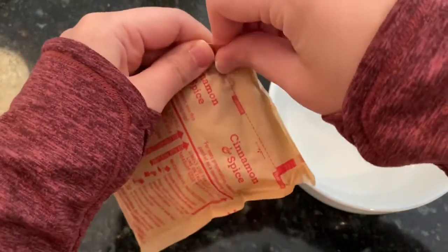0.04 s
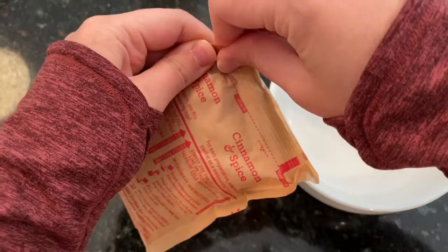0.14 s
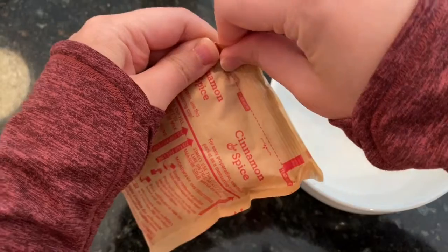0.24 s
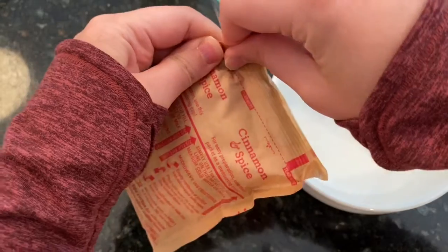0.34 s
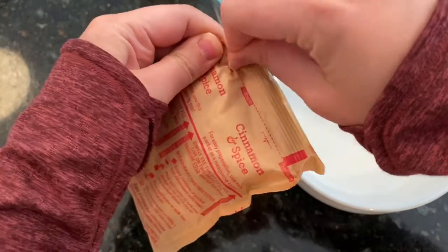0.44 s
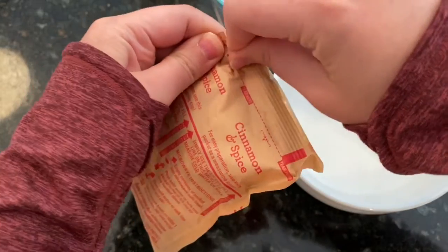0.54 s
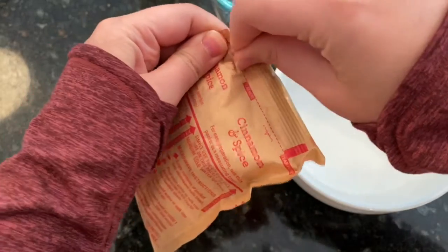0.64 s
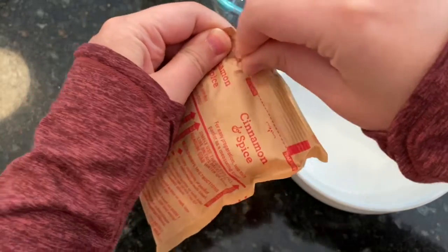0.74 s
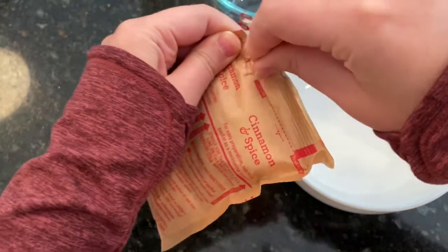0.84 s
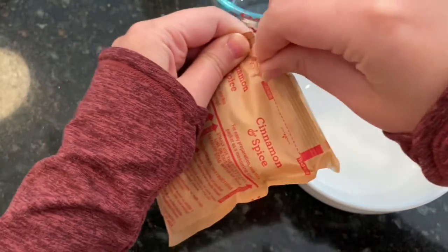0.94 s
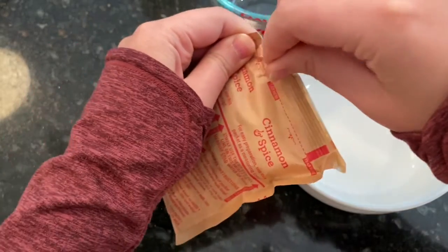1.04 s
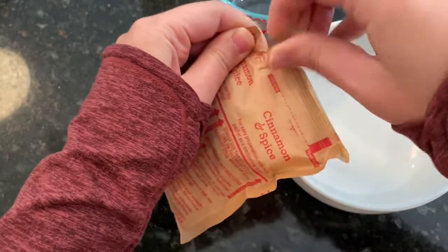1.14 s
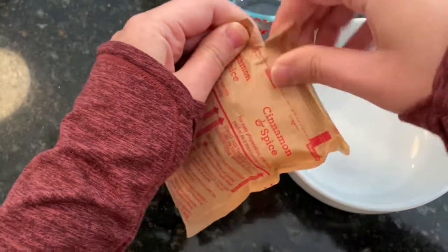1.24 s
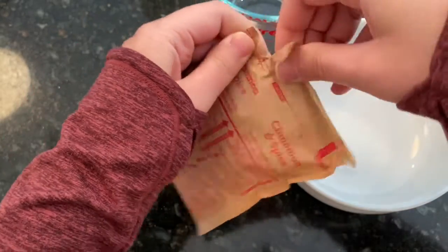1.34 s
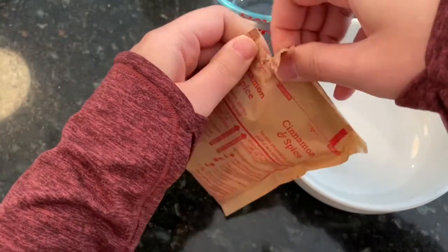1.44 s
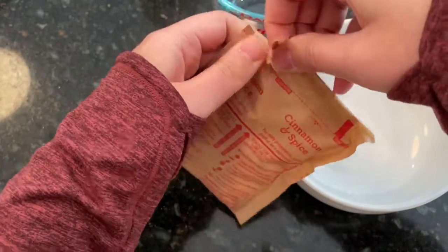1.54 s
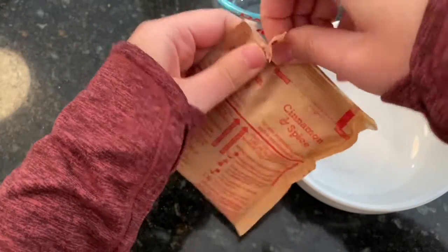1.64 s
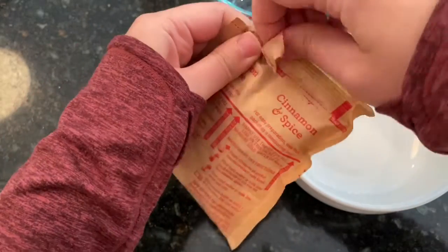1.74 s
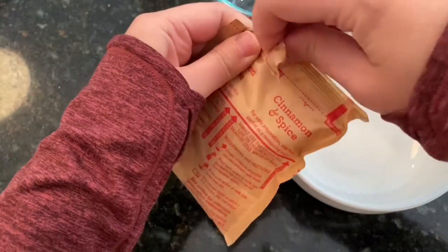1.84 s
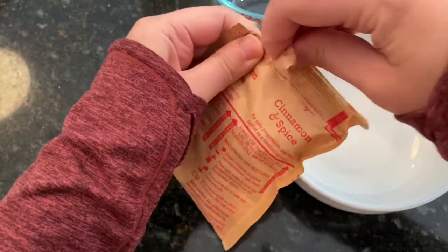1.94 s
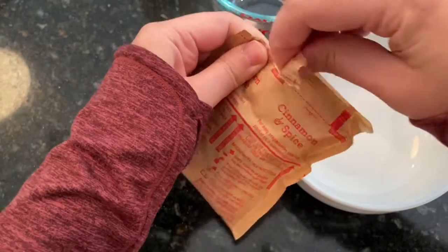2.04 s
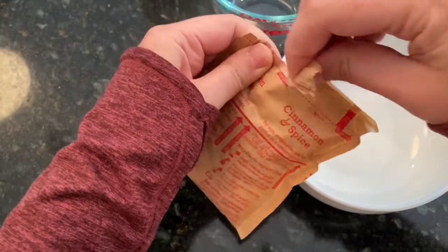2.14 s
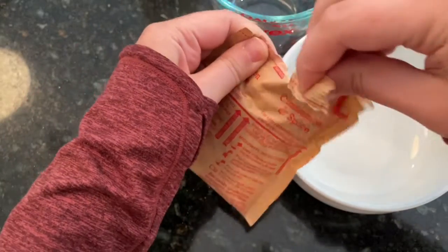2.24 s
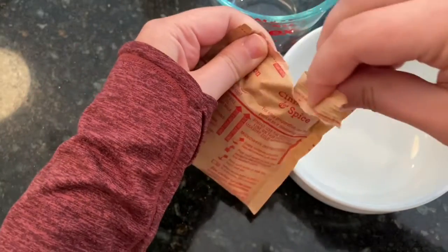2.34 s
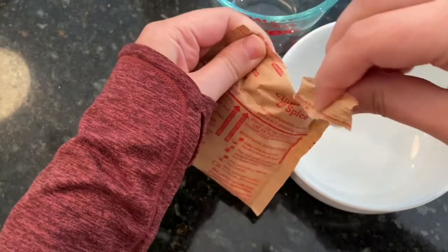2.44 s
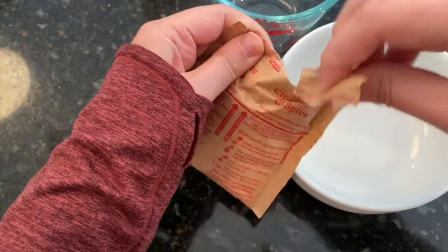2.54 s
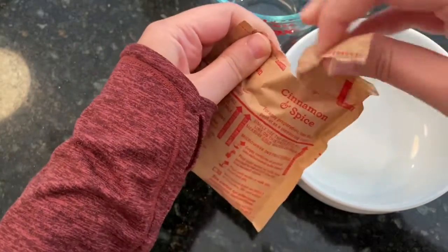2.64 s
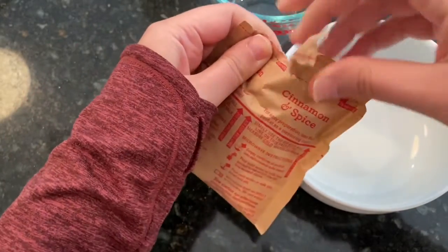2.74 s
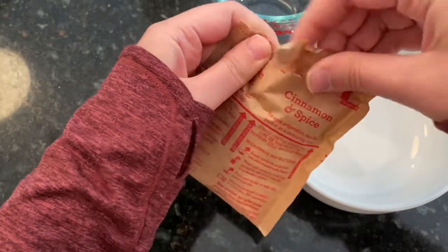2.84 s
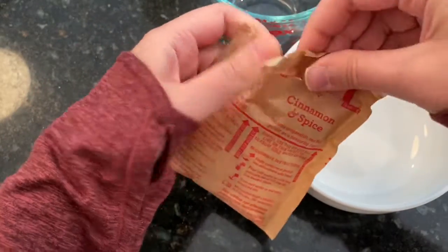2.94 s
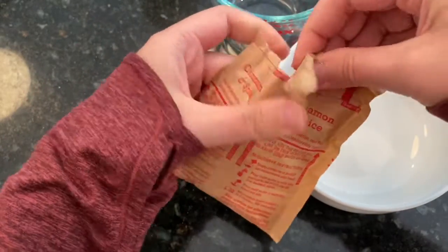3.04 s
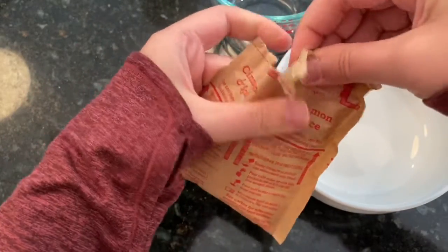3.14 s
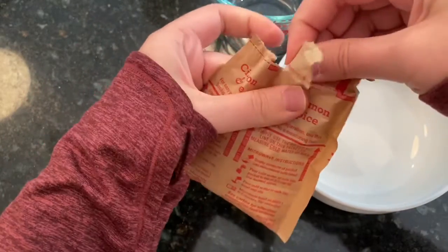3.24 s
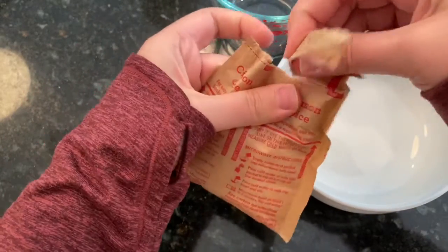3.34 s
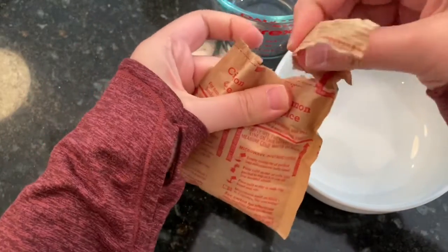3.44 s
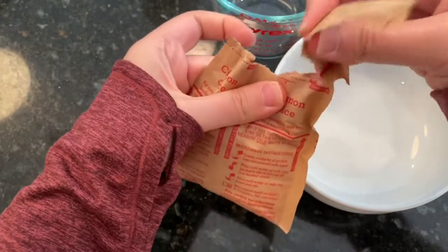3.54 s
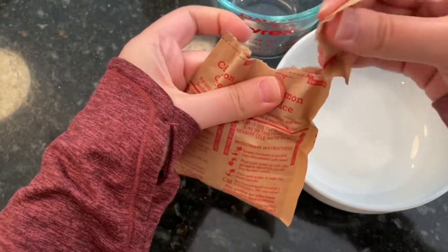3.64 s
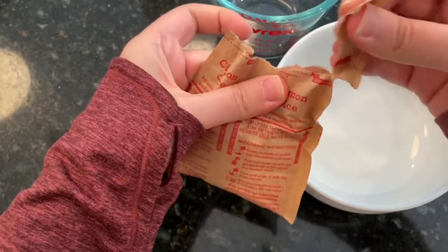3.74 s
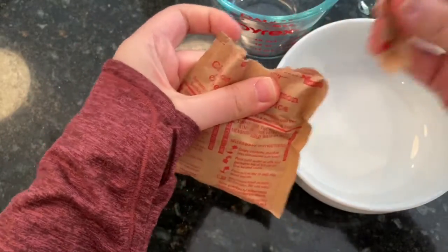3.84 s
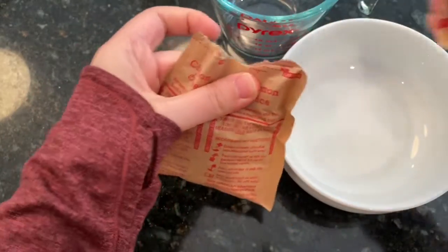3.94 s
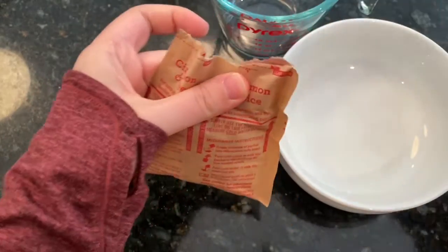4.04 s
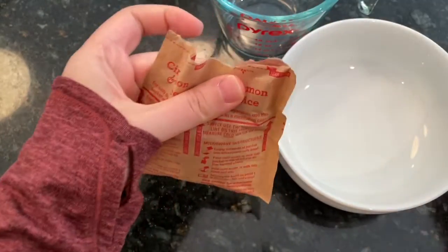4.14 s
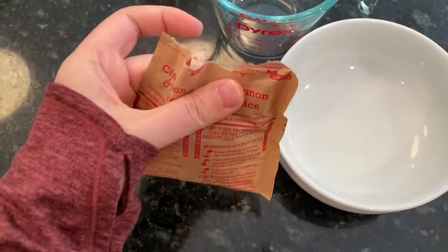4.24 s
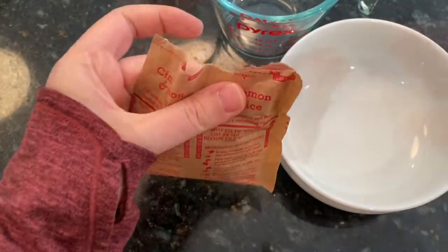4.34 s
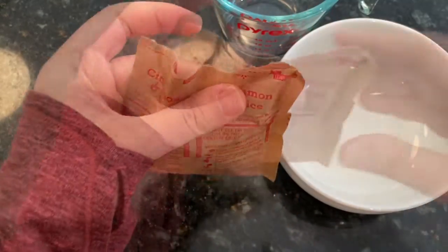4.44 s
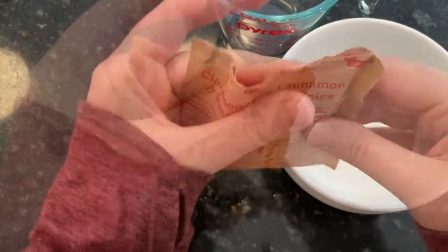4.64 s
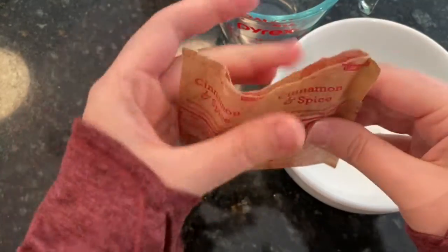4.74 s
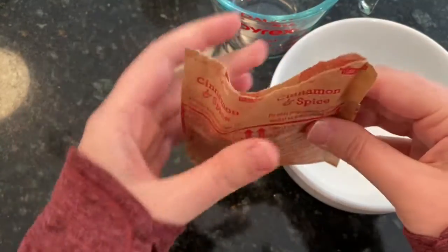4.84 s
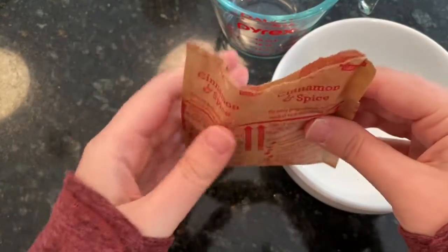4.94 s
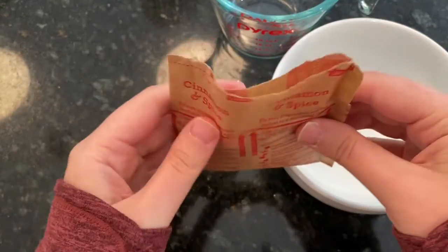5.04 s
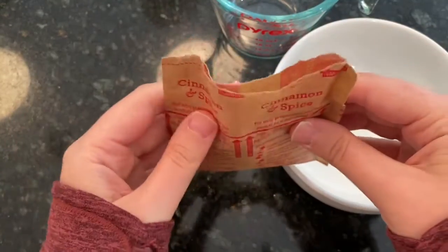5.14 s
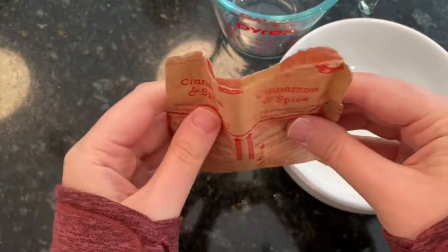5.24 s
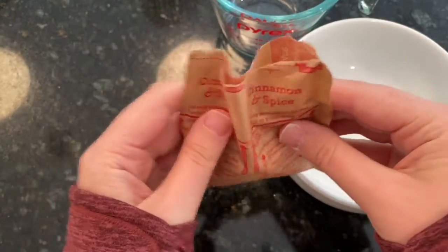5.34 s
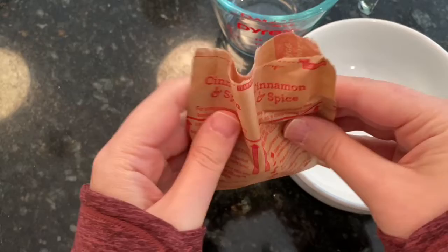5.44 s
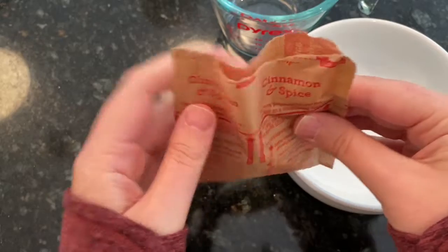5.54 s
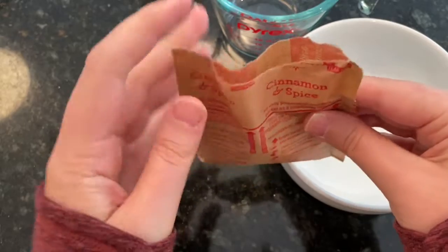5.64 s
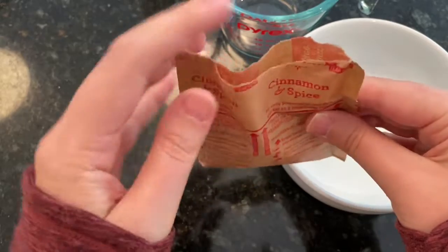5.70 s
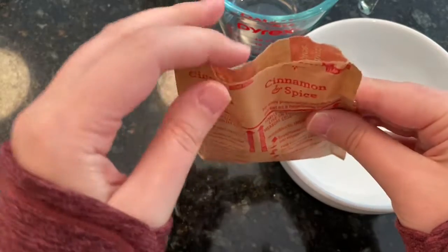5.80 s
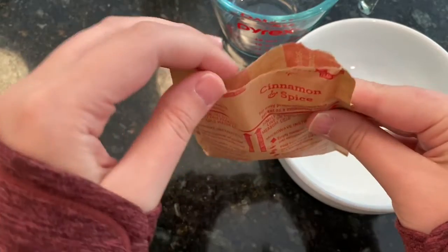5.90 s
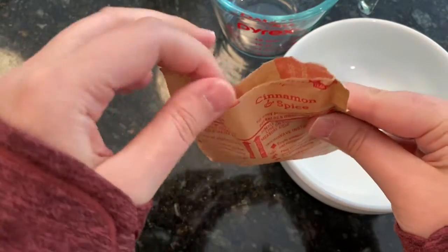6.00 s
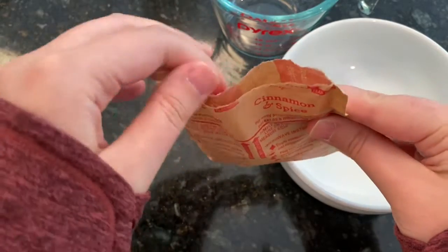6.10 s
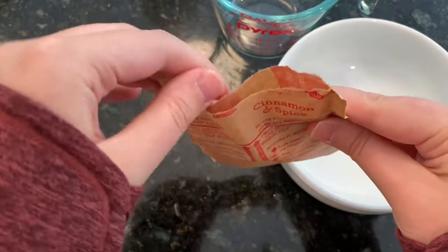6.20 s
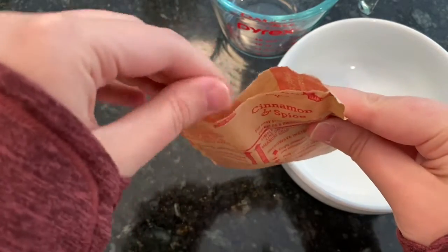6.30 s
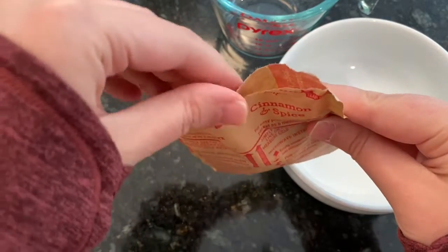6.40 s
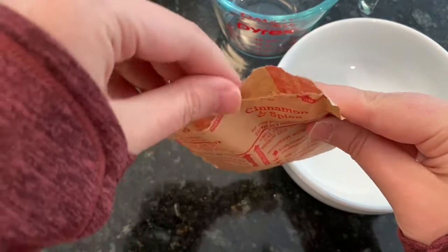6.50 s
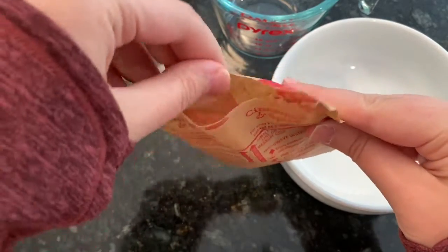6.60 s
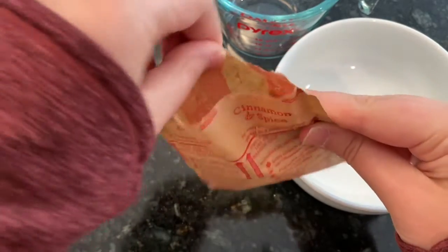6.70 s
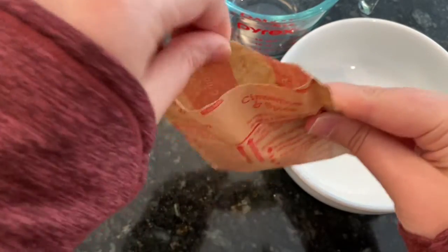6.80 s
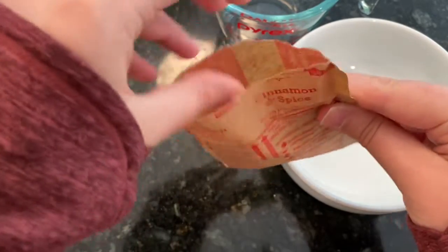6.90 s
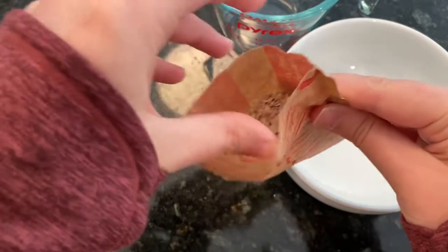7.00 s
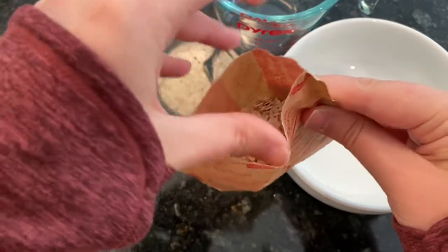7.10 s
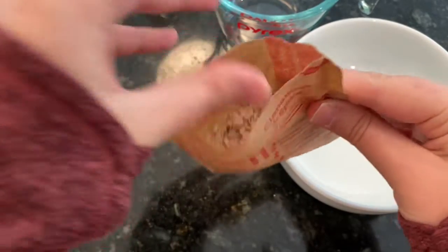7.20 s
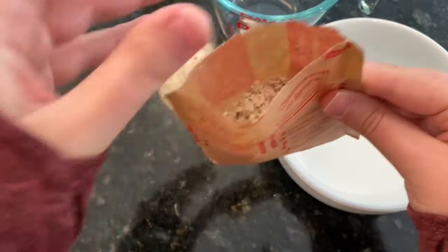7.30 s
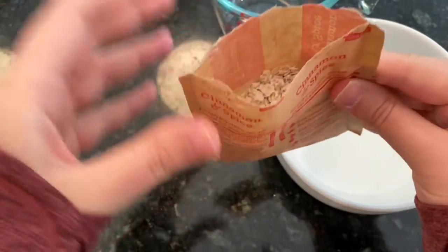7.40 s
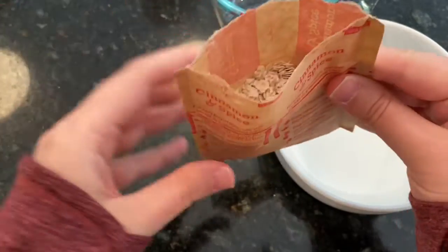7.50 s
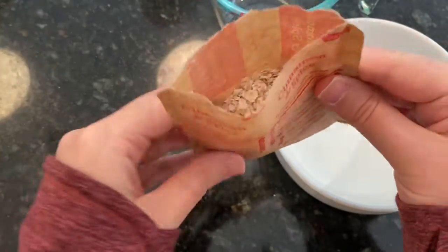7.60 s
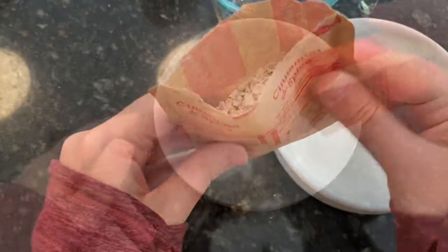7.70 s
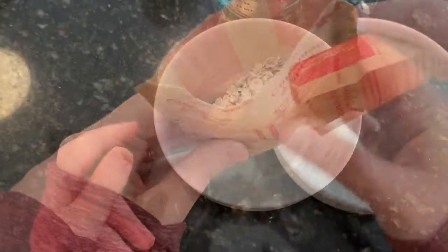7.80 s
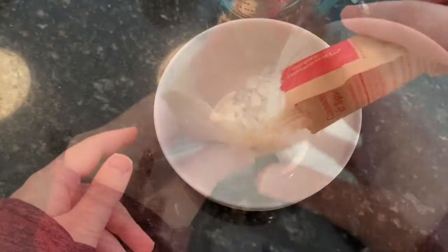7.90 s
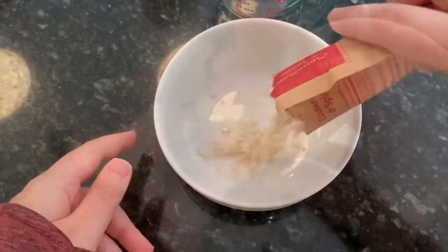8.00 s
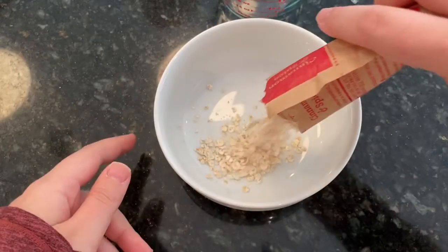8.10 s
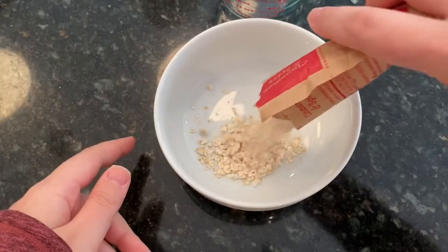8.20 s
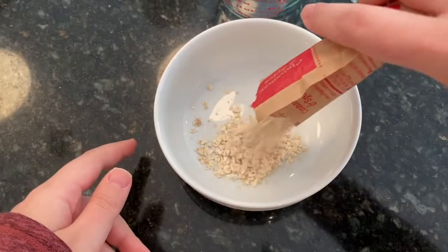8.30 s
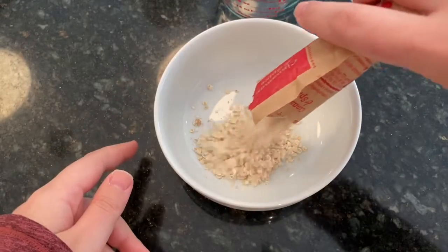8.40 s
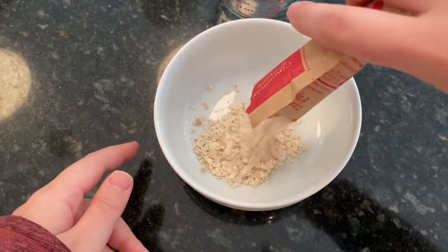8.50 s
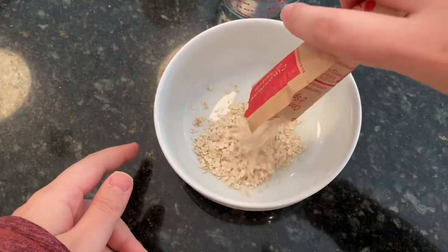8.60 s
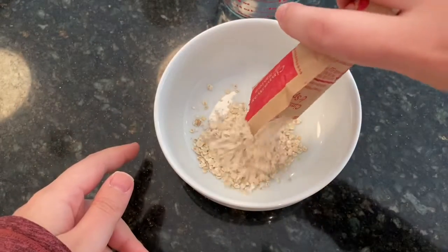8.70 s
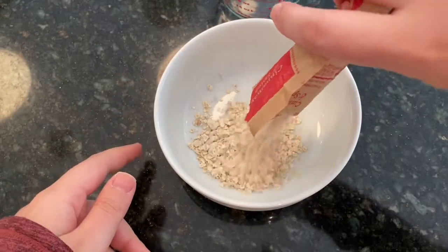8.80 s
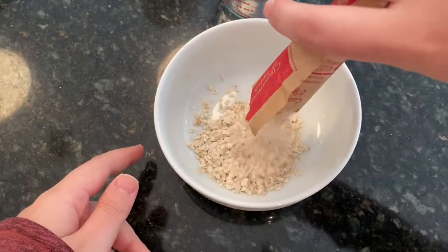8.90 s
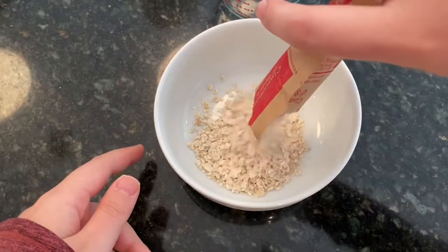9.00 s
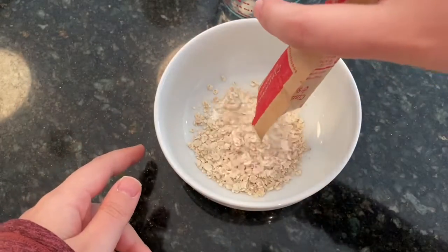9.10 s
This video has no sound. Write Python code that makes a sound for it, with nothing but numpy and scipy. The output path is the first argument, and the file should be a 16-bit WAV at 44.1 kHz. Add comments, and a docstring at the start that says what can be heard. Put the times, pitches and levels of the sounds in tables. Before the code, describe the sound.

Very close, hands work at a stiff paper packet: soft rubbing, sharp little cracks and short fizzy rips, thickest from one to four seconds. After a near-silent pause the paper is crinkled open in sparser bursts. At about eight seconds dry flakes pour into a ceramic bowl, a bright patter with a faint ring and a few lumps dropping. A low fridge hum sits behind; close stereo microphone in a kitchen.

```python
"""Paper packet torn, flakes poured

Close by, over a stone counter, hands tear a paper packet, pull it wide and pour dry flakes into a bowl.
Paper is filtered noise and short clicks: rubs, single cracks, dense rips and low thumps of the bag wall.
Flakes are a patter of pitched grains that rings the bowl's modes; lumps drop on the heap.
Behind, a fridge hums in two sines over low room noise; this background dips briefly twice.
The microphone has two ports a little apart: phase, balance and likeness vary with frequency."""
import sys
import numpy as np
from scipy import signal
from scipy.io import wavfile
from scipy.ndimage import uniform_filter1d

SR = 44100
rng = np.random.default_rng(int(sys.argv[2]) if len(sys.argv) > 2 else 0)


def file_out(sig):
    """Save sig as 16-bit WAV at sys.argv[1]."""
    # one column per channel
    cols = np.atleast_2d(sig).T
    # limit, then scale
    lim = np.clip(cols, -1, 1)
    pcm = np.round(lim * 32767).astype(np.int16)
    wavfile.write(sys.argv[1], SR, pcm)


N = 403515

# Fridge and room, in the background
HUM_HZ, HUM_DB = 58.8, -50
OVERTONE_DB = -11.5  # middle of its wavering level, against the fundamental
ROOM_NOISE_DB = -5  # against the hum
# Spectrum of the room noise: f/Hz, relative level per Hz/dB
ROOM_SPECTRUM = [(45, -34), (75, -8), (90, -2.5), (150, -10.5), (230, -4.5), (360, -4.5), (520, -10.5),
                 (640, -20), (1000, -61), (15800, -79), (16200, -99.5)]
# Likeness of the room noise at the two ports: f/Hz, correlation/1
ROOM_LIKENESS = [(60, 0.59), (300, 0.86), (1400, 0.056)]
# Brief dips of the background: t of the lowest point/s, depth/dB, fall/s, return/s
BACKGROUND_DIPS = [(4.59, -5, .29, .21), (7.92, -7, .14, .2)]

# Fingers sliding and contents shifting: t/s, level/dB
HANDLING_LEVEL = [(0, -54), (.29, -68), (.55, -59), (.8, -47.5), (.93, -53), (1.08, -61), (1.35, -49.5),
                  (1.75, -49), (2.1, -45), (2.45, -45.5), (2.58, -54), (2.75, -52.5), (3.2, -48.5),
                  (3.9, -58), (4.1, -59.5), (4.25, -71.5), (4.5, -72), (4.75, -51), (4.88, -66.5),
                  (5.05, -54), (5.45, -50.5), (5.7, -56), (5.8, -68), (6.05, -56), (6.3, -66),
                  (6.62, -52.5), (6.8, -48.5), (7.15, -52.5), (7.32, -66.5), (7.54, -78), (7.62, -51),
                  (7.8, -55.5), (7.96, -44)]
RUSTLE_END_S, RUSTLE_OFF_DB = 7.99, -88  # the hands let the packet rest as the pouring starts
RUB_BODY_DB = -5  # rustle below 1.5 kHz, against its crispness
# Colour of the paper: f/Hz, relative level/dB
PAPER_SPECTRUM = [(150, 0.5), (500, 1), (1500, 2.5), (3000, 3.5), (5000, 0.5), (8000, -1), (11500, -0.5),
                  (15700, -6.5), (16100, -57)]

# Creases that buckle and fibres that let go: t/s, body level/dB, crisp level above 3 kHz/dB
CREASE_SNAPS = [(0.047, -39, -45), (0.219, -33.5, -36), (0.305, -39.5, -54), (0.413, -25, -37),
                (0.48, -43, -29.5), (0.502, -31.5, -27.5), (0.619, -34, -31.5), (0.644, -42, -24.5),
                (0.678, -29, -29.5), (0.696, -26.5, -24), (0.705, -29.5, -21), (0.725, -38, -19),
                (0.746, -44, -19), (0.806, -23.5, -20), (0.821, -23.0, -15.5), (0.917, -19.5, -17.5),
                (0.984, -53.0, -37), (1.02, -53.0, -38.5), (1.109, -35.0, -60.5), (1.117, -31.5, -30.0),
                (1.146, -48, -35.5), (1.157, -33.5, -41), (1.212, -32.5, -26), (1.226, -44.5, -26.5),
                (1.234, -33.5, -31), (1.253, -20, -18.5), (1.326, -36.0, -44), (1.38, -39, -45),
                (1.399, -27, -18.5), (1.415, -35.0, -26), (1.44, -45, -41), (1.487, -31.5, -32.5),
                (1.579, -30.5, -23), (1.587, -31, -34), (1.61, -27, -16), (1.619, -33, -18),
                (1.628, -18, -11.5), (1.64, -31, -23), (1.675, -33, -18.0), (1.693, -28.5, -17),
                (1.707, -35.0, -20.5), (1.716, -37, -23.5), (1.726, -41.5, -25.5), (1.768, -38, -28),
                (1.793, -22, -24), (1.828, -32, -29), (1.859, -54, -30.5), (1.889, -49, -38),
                (1.931, -33, -23), (1.953, -22.5, -26.0), (1.985, -24.5, -28), (2.025, -23.5, -17.5),
                (2.09, -53, -30), (2.122, -42, -26), (2.135, -46, -25), (2.142, -31, -24.5),
                (2.158, -33, -22), (2.168, -44, -22), (2.196, -18, -19.5), (2.245, -36, -33),
                (2.267, -19.5, -17), (2.293, -24.5, -31), (2.307, -30, -24), (2.336, -31.5, -28),
                (2.405, -39, -24), (2.426, -48, -22), (2.475, -36, -20.5), (2.492, -45, -33),
                (2.566, -37, -46), (2.578, -42, -31.0), (2.592, -30.5, -25.5), (2.617, -26, -28),
                (2.644, -35.5, -33.5), (2.701, -26, -21), (2.804, -24, -16.5), (2.85, -30.5, -21.5),
                (2.865, -30, -29), (2.885, -37, -26), (2.891, -42, -27), (2.904, -27.0, -23.5),
                (2.94, -46, -50), (2.958, -27, -44), (2.975, -32.5, -30.5), (2.987, -32, -36.0),
                (3.012, -22.5, -22.5), (3.031, -21, -14.5), (3.076, -32, -45), (3.096, -20, -20),
                (3.144, -32.5, -20.0), (3.149, -25, -27.5), (3.168, -23, -16.5), (3.182, -26, -24),
                (3.2, -40, -28), (3.209, -30, -31), (3.257, -47, -27.0), (3.286, -26.5, -34),
                (3.306, -21, -17), (3.362, -28, -17.5), (3.708, -45.0, -30), (3.725, -43.5, -28),
                (3.734, -42, -28), (3.743, -39.0, -28.0), (3.751, -33.5, -35), (3.813, -27, -26),
                (3.822, -31, -34), (3.83, -23, -19.5), (3.956, -41, -25.5), (4.087, -47.5, -34.0),
                (4.541, -48.5, -41.5), (4.678, -37, -44), (4.738, -27, -35), (4.779, -42.5, -36.5),
                (4.915, -40, -48), (5.034, -36.5, -30), (5.08, -38, -41), (5.111, -26, -17),
                (5.118, -34, -37), (5.186, -46, -28), (5.193, -34.5, -29.5), (5.206, -31.0, -28),
                (5.223, -30, -17.5), (5.238, -31, -30), (5.246, -36, -23.5), (5.272, -36, -44),
                (5.289, -25.5, -18), (5.325, -43, -30.5), (5.35, -33.0, -27), (5.366, -35.5, -35),
                (5.413, -28.5, -14.5), (5.561, -37, -39.0), (5.867, -45, -46.5), (5.941, -41, -48),
                (6.025, -32, -35.5), (6.09, -38.5, -48.0), (6.154, -51, -38), (6.333, -46.5, -42.5),
                (6.421, -42.5, -54), (6.471, -28, -31), (6.563, -37, -38), (6.659, -34.5, -31),
                (6.676, -28.5, -21), (6.689, -28, -27), (6.694, -27.5, -18.5), (6.704, -30.0, -36),
                (6.714, -24, -13), (6.723, -21, -21), (6.741, -37.0, -37), (6.768, -25.5, -21.5),
                (6.8, -22, -20), (6.896, -38, -52), (6.947, -23.5, -14), (6.957, -22, -27),
                (6.977, -30, -15), (6.996, -23.5, -14), (7.071, -25, -19), (7.212, -38, -59),
                (7.224, -36.5, -42), (7.659, -32.5, -34), (7.729, -37, -22.5), (7.866, -44.5, -27),
                (7.885, -40, -27), (7.89, -36.0, -22.5), (7.911, -26, -18), (7.922, -39.0, -38),
                (7.938, -29, -20.0), (7.946, -46, -27), (7.96, -33.5, -25.5)]
CRACK_T60_S, CRACK_RISE_S = 0.009, 0.0001  # envelope of one crack, before the crisp part is sharpened
RUN_S = 0.00279  # longest wait for the second crack of a fold; the third may take twice as long
BODY_LATE_S = 0.0009  # the body speaks a little late
PANEL_HZ, PANEL_OCTAVES, PANEL_T60_S = 1510, .45, 0.0077  # middle pitch, spread either way, decay

# Bursts in which fibres part or the sheet crumples:
# t/s, length/s, first level/dB, last level/dB, sizzle above 7 kHz/dB
RIP_BURSTS = [(0.403, .091, -37, -57.5, 2.5), (0.623, 0.12, -48, -40.5, 14), (0.829, 0.081, -40, -37, 7),
              (1.744, 0.11, -43.5, -35.5, 6.5), (1.939, .13, -30, -37, 5.5), (2.128, 0.051, -36, -41.5, 10),
              (2.179, 0.12, -34.5, -30, 5), (2.316, 0.041, -43, -43.5, 12),
              (2.377, .082, -40.5, -45.5, 9.5), (2.472, 0.041, -36, -37, 6.5),
              (3.14, .062, -42, -29.5, -18), (3.313, .11, -27.5, -32, 6.5), (3.505, 0.088, -41, -38, 10.5),
              (3.746, 0.0956, -38, -32.5, 7.5), (5.286, 0.043, -35, -39, 2), (5.331, 0.059, -44, -39, 1),
              (5.548, 0.052, -50, -55, 5), (6.661, 0.092, -27, -41.5, -17),
              (6.956, 0.0586, -34.5, -27, -5.5), (7.654, 0.072, -41, -50, -2.5)]
# Body gain at the usual level, and its change per dB of level: louder rips are crisper
RIP_BODY_DB, RIP_BODY_PER_DB, RIP_USUAL_DB = -12, -1.03, -36
RAGGED = 0.24  # power share of larger, slower fibres

# Bag wall popping in or out: t/s, peak level/dB, f/Hz
WALL_POPS = [(0.406, -30, 450), (.68, -28.5, 523), (.913, -27.5, 493), (1.95, -26, 497), (2.021, -29, 420),
             (2.19, -25.5, 503), (2.9, -29, 308), (3.011, -24, 497), (3.812, -26, 600), (3.831, -29.5, 300),
             (5.29, -35.5, 244), (6.658, -28, 186), (6.71, -24.5, 345), (6.967, -25.5, 450),
             (7.888, -32, 300), (7.94, -34, 402), (7.959, -35, 293)]

# The stream of flakes: t/s, level/dB
POUR_LEVEL = [(7.9, -87), (7.97, -50.5), (8.09, -52), (8.2, -48), (9.15, -49)]
# Colour of the flakes: f/Hz, relative level/dB
FLAKE_SPECTRUM = [(700, -12.5), (1300, -5.5), (1800, 0), (2400, -6), (3300, -1.5), (5000, -7), (8000, -5.5),
                  (12000, -8), (15700, -7.5), (16200, -54)]
# Modes of the ceramic bowl: f/Hz, gain/dB, t60/s
BOWL_MODES = [(1900, -2.5, 0.068), (2860, -7.5, 0.072), (4560, 1, 0.18), (7240, 1, 0.29), (11040, -2, 0.15),
              (14760, -9, .12)]
# Clumps that strike the bare bowl: t/s, strike level before the modes/dB
BOWL_STRIKES = [(7.966, -43.5), (8.046, -47)]
COVERED_S = .15  # time constant with which the heap covers the bare ceramic
# Lumps that drop on the heap: t/s, peak level/dB, f/Hz
HEAP_LUMPS = [(8.218, -21.5, 2730), (8.571, -17, 2400), (8.837, -29.5, 1110), (8.93, -33, 800),
              (9.024, -23.5, 776), (9.053, -22, 1880)]

# Two-port microphone: f/Hz, phase by which left leads right/rad
PORT_LEAD = [(0, 0), (2240, .5), (3300, 2.0), (5300, .8), (6500, -1.0), (8400, -3.14), (11300, -6.7),
             (13400, -9.42), (15300, -12.3)]
# Balance of the ports: f/Hz, left over right/dB
PORT_BALANCE = [(200, -1), (700, 3.5), (2400, .5), (4400, 1.5), (9000, -.5)]
# Near sounds at the two ports: f/Hz, amplitude share common to both/1
NEAR_LIKENESS = [(300, 0.71), (1500, 0.68), (4000, 0.14), (9000, 0.6), (13400, 1), (16000, 0.39)]
EDGE_HZ = 16500  # upper edge of the sound's band


def gain_of(db):
    """Amplitude factor of a level in dB."""
    return 10 ** (np.asarray(db) / 20)


def evened(x):
    """Scales x to unit power."""
    return x / np.sqrt(np.mean(x ** 2) + 1e-20)


def peaked(x):
    """Scales x to a peak of one."""
    return x / abs(x).max()


def loudest(x):
    """Scales x so that its loudest two milliseconds have unit power."""
    return x / np.sqrt(uniform_filter1d(x ** 2, size=88).max())


def read(points, hz):
    """Reads a frequency curve, straight between its points on a logarithmic axis."""
    f, value = np.transpose(points)
    return np.interp(np.log(hz + 1), np.log(f + 1), value)


def along(rows):
    """A timed level in dB at every sample."""
    s, level_db = np.transpose(rows)
    return np.interp(np.arange(N) / SR, s, level_db)


def add_at(out, s, burst):
    """Mixes a burst into out from s seconds on."""
    start = round(s * SR)
    out[start:start + len(burst)] += burst


def coloured(x, points):
    """Causal minimum-phase filter with the given dB spectrum."""
    log_gain = np.log(gain_of(read(points, abs(np.fft.fftfreq(4096, 1 / SR)))))
    taps = np.fft.ifft(np.exp(np.conj(signal.hilbert(log_gain)))).real[:2048]
    return signal.oaconvolve(x, taps)[:len(x)]


def ring(x, hz, t60):
    """A mode struck by x: a two-pole resonator."""
    r = gain_of(-60 / t60 / SR)
    w = 2 * np.pi * hz / SR
    return signal.lfilter([np.sin(w)], [1, -2 * r * np.cos(w), r * r], x)


def grains(per_s, spread_db, t60, count, lowest_hz):
    """Random clicks of uneven size, each a short dying burst taken from a few pitched shapes."""
    size = gain_of(spread_db * np.minimum(rng.exponential(1, N), 5))
    clicks = size * (rng.random(N) < per_s / SR)
    choice = rng.integers(0, count, N)
    t = np.arange(600) / SR
    bursts = rng.standard_normal((count, 600)) * gain_of(-60 * t / t60)
    out = np.zeros(N)
    for k, hz in enumerate(np.geomspace(lowest_hz, 12000, count)):
        pitch = evened(ring(bursts[k], hz, 8 / hz)) * (hz / 12000) ** .5
        out += signal.oaconvolve(clicks * (choice == k), evened(bursts[k]) + pitch)[:N]
    return evened(out)


def clumps(width):
    """Uneven swells that last about this many samples."""
    slow = uniform_filter1d(uniform_filter1d(rng.standard_normal(N), width), width)
    return np.clip(evened(slow), -3, 2)


def sheet(raw):
    """Noise and clicks coloured by the paper, split at 1.5 kHz into body and crispness."""
    paper = evened(coloured(raw, PAPER_SPECTRUM))
    body = signal.filtfilt(*signal.butter(2, 1500, fs=SR), paper)
    return evened(body), evened(paper - body)


def background_db():
    """A steady level that sinks and comes back at each dip."""
    t = np.arange(N) / SR
    level_db = np.full(N, float(HUM_DB))
    for s, depth_db, fall, back in BACKGROUND_DIPS:
        level_db += np.interp(t, [s - fall, s, s + back], [0, depth_db, 0])
    return level_db


def room_noise():
    """Random spectra in overlapping frames, partly alike at the two ports."""
    frames, hz = N // 512 + 5, np.fft.rfftfreq(2048, 1 / SR)
    a, b, c, d = rng.standard_normal((frames, 1025, 4)).T
    same = read(ROOM_LIKENESS, hz)[:, None]
    left, other = a + 1j * b, c + 1j * d
    right = same * left + np.sqrt(1 - same ** 2) * other
    z = np.array([left, right]) * gain_of(read(ROOM_SPECTRUM, hz))[:, None]
    return evened(signal.istft(z, nperseg=2048, noverlap=1536)[1][:, :N])


def kitchen():
    """Fridge motor hum, a sine with a wavering octave overtone, over low room noise."""
    noise = room_noise()
    waver = evened(uniform_filter1d(uniform_filter1d(rng.standard_normal(N), 4000), 4000))
    turn = 2 * np.pi * HUM_HZ * np.arange(N) / SR
    overtone = gain_of(OVERTONE_DB + 2.5 * waver) * np.sin(2 * turn)
    hum = np.sqrt(2) * (np.sin(turn) + overtone)
    return gain_of(background_db()) * (hum + gain_of(ROOM_NOISE_DB) * noise)


def rustle():
    """Rubbing paper: a soft bed of swelling noise with scattered small crackles."""
    level_db = along(list(HANDLING_LEVEL) + [(RUSTLE_END_S, RUSTLE_OFF_DB)])
    bed = rng.standard_normal(N) * gain_of(3.25 * clumps(700))
    crackles = grains(per_s=120, spread_db=2.5, t60=0.0039, count=14, lowest_hz=910)
    body, crisp = sheet(bed + 0.67 * crackles)
    return gain_of(level_db) * (crisp + gain_of(RUB_BODY_DB) * body)


def snaps():
    """Each crease gives way in up to three quick cracks and briefly rings a panel of its own size."""
    out, t = np.zeros(N), np.arange(2000) / SR
    high = signal.butter(2, [3000, 15500], "band", fs=SR)
    middle = signal.butter(2, [600, 4000], "band", fs=SR)
    crack = gain_of(-60 * t / CRACK_T60_S) * (1 - np.exp(-t / CRACK_RISE_S))
    for s, body_db, crisp_db in CREASE_SNAPS:
        a, b = rng.standard_normal((2, 2000))
        size, second, third, wait2, wait3 = rng.random(5)
        run = 2 * crack
        run = run + second * np.roll(crack, int(wait2 * RUN_S * SR))
        run = run + third * np.roll(crack, int(wait3 * 2 * RUN_S * SR)) / 2
        late = np.roll(run, int(BODY_LATE_S * SR))
        hz = PANEL_HZ * 2 ** (PANEL_OCTAVES * (2 * size - 1))
        panel = evened(ring(a * late, hz, PANEL_T60_S))
        body = panel + 1.47 * evened(signal.lfilter(*middle, b * late))
        crisp = signal.lfilter(*high, b * run ** 1.29)  # the power sharpens the cracks
        add_at(out, s, gain_of(body_db) * loudest(body) + gain_of(crisp_db) * loudest(crisp))
    return out


def rips():
    """Fibres snap in small surges, thousands a second, among fewer larger ones."""
    clean = grains(per_s=4000, spread_db=3.0, t60=0.0022, count=10, lowest_hz=520)
    clean = evened(clean * gain_of(3.3 * clumps(240)))
    ragged = grains(per_s=320, spread_db=2.5, t60=0.019, count=12, lowest_hz=450)
    body, crisp = sheet(np.sqrt(1 - RAGGED) * clean + np.sqrt(RAGGED) * ragged)
    mids = signal.filtfilt(*signal.butter(2, 7000, fs=SR), crisp)
    sizzle = crisp - mids
    out = np.zeros(N)
    for s, length, first_db, last_db, sizzle_db in RIP_BURSTS:
        at = slice(round(s * SR), round(s * SR) + round(length * SR))
        level_db = np.linspace(first_db, last_db, len(out[at]))
        # the body keeps nearly one loudness while the crispness follows the level
        body_db = RIP_BODY_DB + RIP_BODY_PER_DB * (level_db - RIP_USUAL_DB)
        edges = signal.windows.tukey(len(level_db), min(0.014 / length, 1))
        mix = mids[at] + gain_of(sizzle_db) * sizzle[at] + gain_of(body_db) * body[at]
        out[at] += edges * gain_of(level_db) * mix
    return out


def thumps():
    """The bag wall pops and pushes air: dying noise in a low band."""
    out, t = np.zeros(N), np.arange(2000) / SR
    for s, db, hz in WALL_POPS:
        low = signal.butter(2, [hz / 1.48, hz * 1.71], "band", fs=SR)
        push = rng.standard_normal(2000) * gain_of(-60 * t / 0.1)
        add_at(out, s, gain_of(db) * peaked(signal.lfilter(*low, push)))
    return out


def flake_stream():
    """Light flakes patter on the heap: dense pitched grains under the pouring level."""
    patter = grains(per_s=1800, spread_db=-0.55, t60=0.027, count=14, lowest_hz=1400)
    return gain_of(along(POUR_LEVEL)) * evened(coloured(patter, FLAKE_SPECTRUM))


def bowl(stream):
    """Flakes and clumps strike the ceramic's modes; the flakes excite it less as the heap covers it."""
    since_first = np.maximum(np.arange(N) / SR - BOWL_STRIKES[0][0], 0)
    bare = .6 + np.exp(-since_first / COVERED_S)
    blows = .022 * bare * stream * (rng.random(N) < .1)  # a tenth of the samples strike
    for s, db in BOWL_STRIKES:
        blows[round(s * SR)] += gain_of(db)
    return sum(gain_of(db) * ring(blows, hz, t60) for hz, db, t60 in BOWL_MODES)


def lumps():
    """Lumps drop on the heap: a dying noise burst and its short resonance."""
    out, t = np.zeros(N), np.arange(800) / SR
    for s, db, hz in HEAP_LUMPS:
        lump = rng.standard_normal(800) * gain_of(-60 * t / 0.015)
        tick = evened(ring(lump, hz, 0.0022)) + hz / 1000 * evened(lump)
        add_at(out, s, gain_of(db) * peaked(tick))
    return out


def pouring():
    """The flake stream, the faintly ringing bowl and the lumps together."""
    stream = flake_stream()
    return stream + bowl(stream) + lumps()


def ports(x):
    """The right port hears x shifted in phase and partly by changing paths; walls add unlike faint tails."""
    hz, t, z = signal.stft(x, SR, nperseg=256, noverlap=192)
    above = (hz > 200)[:, None]  # lower sounds get no other path and no tail
    same = read(NEAR_LIKENESS, hz)[:, None]
    tail_phases = np.exp(2j * np.pi * rng.random((len(t), len(hz), 2))).T * above
    turn, late = rng.random((len(t), 2)).T
    other = np.exp(2j * np.pi * (turn - hz[:, None] * late * .0008)) * above  # up to 0.8 ms longer
    direct = same * np.exp(-1j * read(PORT_LEAD, hz))[:, None]
    right = direct + np.sqrt(2 * (1 - same ** 2)) * other
    half = gain_of(read(PORT_BALANCE, hz) / 2)[:, None]
    keep = gain_of(-2 * 60 * 64 / SR / .25)  # power left after one step, t60 0.25 s
    tail_power = signal.lfilter([0, 0, 1 - keep], [1, -keep], abs(z) ** 2)  # starts two steps late
    tails = gain_of(-15) * np.sqrt(tail_power) * tail_phases
    both = np.array([z * half, z * right / half]) + tails
    return signal.istft(both, SR, nperseg=256, noverlap=192)[1][:, :N]


def scene():
    """Near sounds through the two ports, with the kitchen behind."""
    near = rustle() + snaps() + rips() + thumps() + pouring()
    return ports(near) + kitchen()


def record(dry):
    """Linear-phase low-pass that ends the band near 16.5 kHz."""
    taps = signal.firwin(201, EDGE_HZ, window=("kaiser", 8), fs=SR)
    return signal.oaconvolve(dry, taps[None], "same")


dry = scene()
out = record(dry)
file_out(out)
```